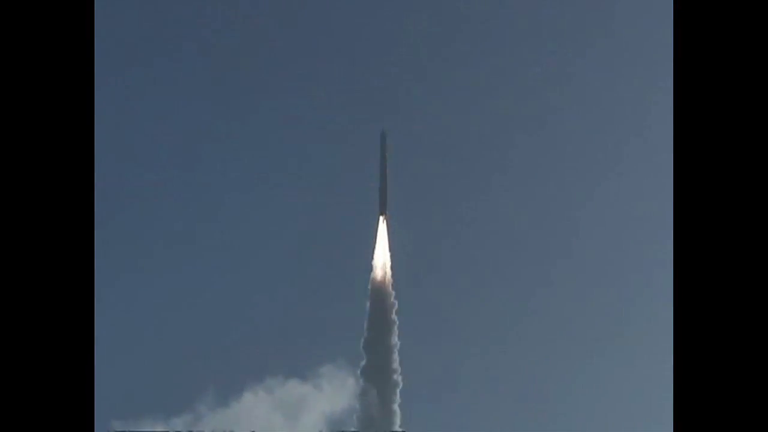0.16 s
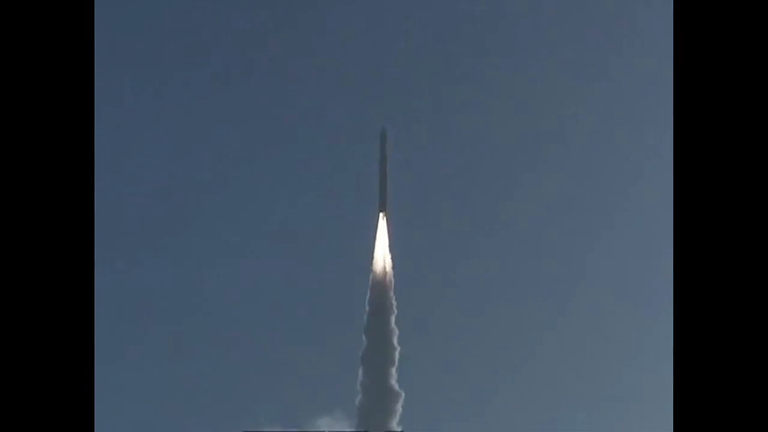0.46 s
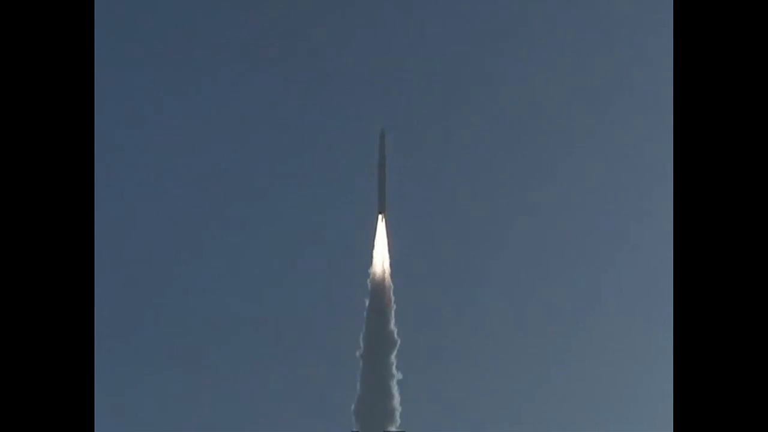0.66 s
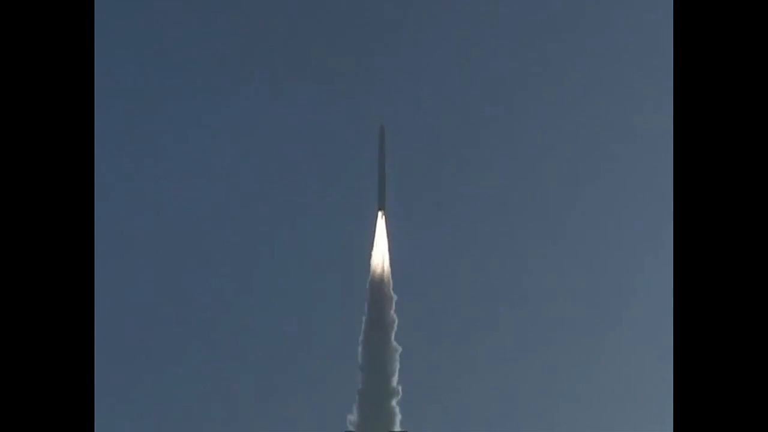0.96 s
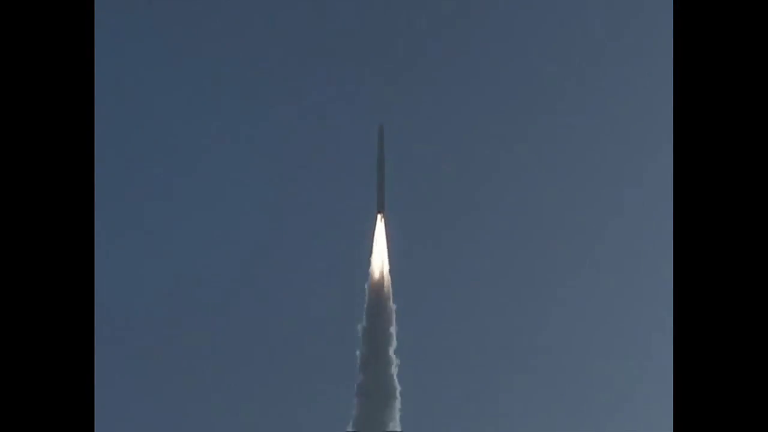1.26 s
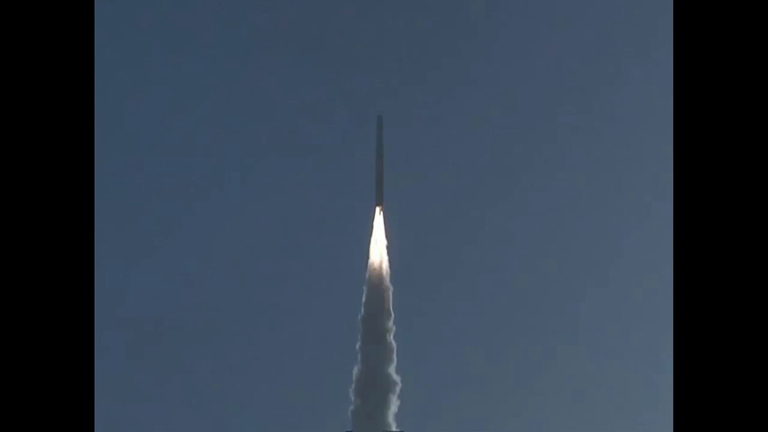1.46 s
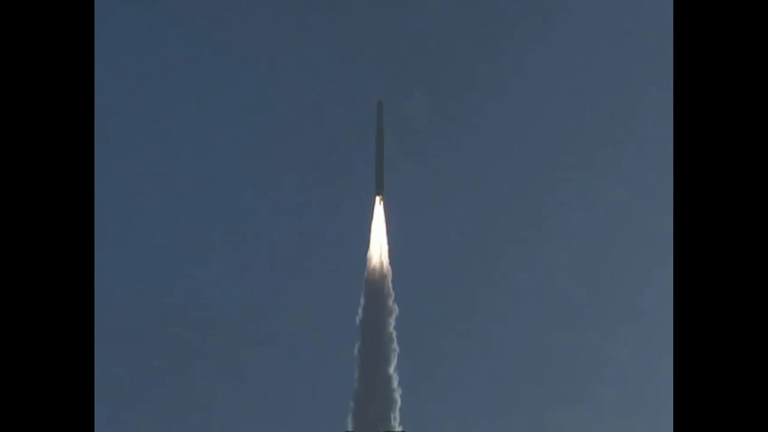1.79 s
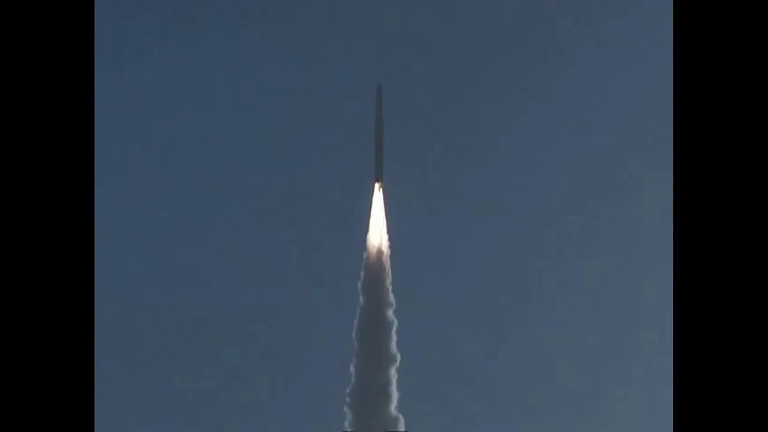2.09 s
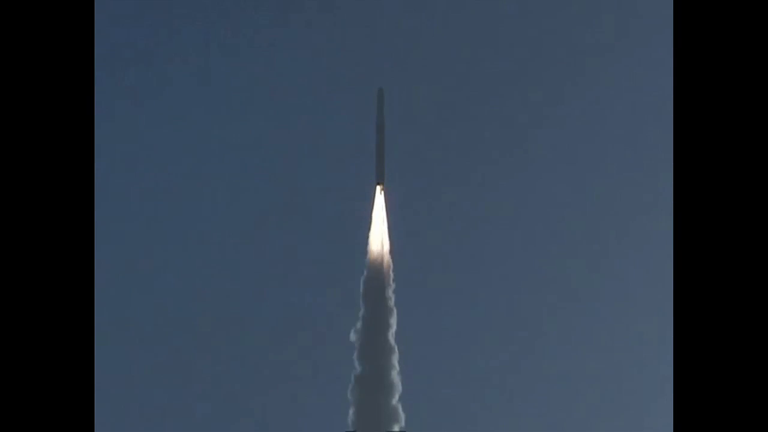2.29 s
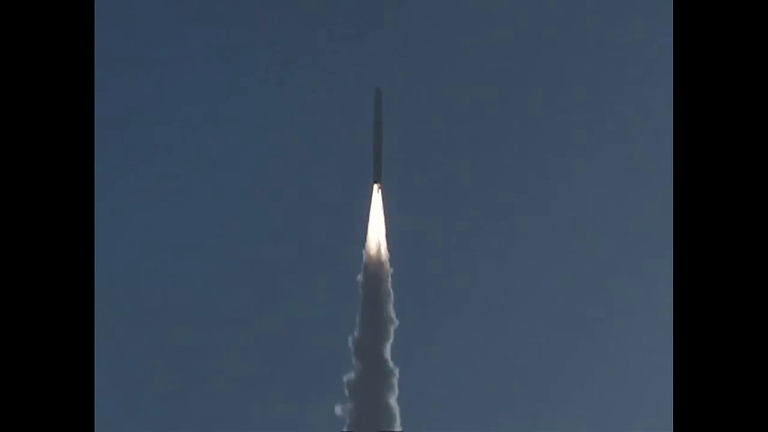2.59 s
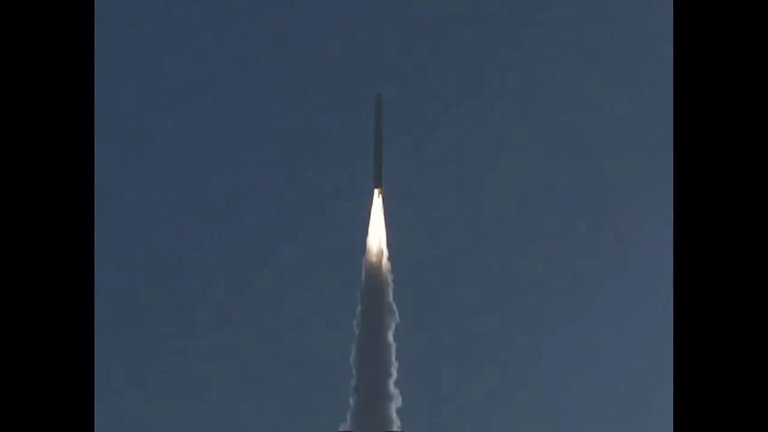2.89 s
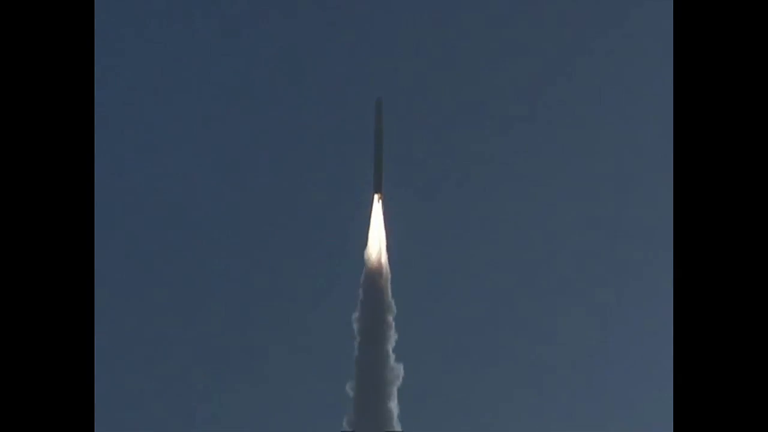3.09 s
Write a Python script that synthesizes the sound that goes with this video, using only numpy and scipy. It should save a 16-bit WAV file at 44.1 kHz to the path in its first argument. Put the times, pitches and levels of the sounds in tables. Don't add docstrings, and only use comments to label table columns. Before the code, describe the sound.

A large rocket climbing far away, heard in an open field. From 0 to 0.9 s, low wind gusts buffet the microphone while dry grass and gear rustle nearby. Around 1.2 s the deep roar rushes in, peaking near 1.5-1.65 s with crackling shocks, then drops by 1.8 s to a steady dull rumble, until about 3.25 s. From 3.0 s small parts click, scrape and faintly squeak close by; faint hiss underneath.

```python
import sys
import numpy as np
from scipy import signal
from scipy.io import wavfile
from scipy.ndimage import uniform_filter1d

SR = 44100
rng = np.random.default_rng(int(sys.argv[2]) if len(sys.argv) > 2 else 0)


def makeup_ratio(level_db):
    decades = np.asarray(level_db, float) / 20
    return 10 ** decades


def bounce(signal):
    frames = np.transpose(np.atleast_2d(signal))
    limited = np.clip(frames, -1, 1)
    pcm = np.round(limited * 32767).astype(np.int16)
    wavfile.write(sys.argv[1], SR, pcm)


N = 143325
T = np.arange(N) / SR


def evened(x):
    return x / np.sqrt(np.mean(x ** 2) + 1e-20)


def read_spectrum(points, hz):
    f, level = np.transpose(points)
    return np.interp(np.log(hz + 1), np.log(f + 1), level)


def colour(x, points):
    hz = abs(np.fft.fftfreq(16384, 1 / SR))
    log_gain = np.log(makeup_ratio(np.maximum(read_spectrum(points, hz), -100)))
    response = np.exp(np.conj(signal.hilbert(log_gain)))
    taps = np.fft.ifft(response).real[:8192]
    return signal.oaconvolve(x, taps)[:N]


def slow_drift(seconds):
    size = max(int(seconds * SR), 2)
    return evened(uniform_filter1d(uniform_filter1d(rng.standard_normal(N), size), size))


def resonate(x, hz, width):
    turn = np.exp(2j * np.pi * np.cumsum(hz * np.ones(len(x))) / SR)
    r = np.exp(-np.pi * width / SR)
    return 2 * (turn * signal.lfilter([1 - r], [1, -r], x / turn + 1e-18)).real


# (frequency [Hz], density [dB per Hz])
ROAR_SPECTRUM = [(8, -30), (20, -4), (60, -0.5), (190, -2), (330, -10), (630, -18.5), (900, -28),
                 (1500, -33.5), (3200, -50), (7000, -75.5), (12000, -72)]
# (time [s], size over the noise [dB])
JET_BANGS = [(1.408, 22), (1.542, 25), (1.589, 24), (1.71, 23), (1.76, 26), (1.838, 23), (1.869, 23),
             (1.992, 23), (2.03, 26), (2.073, 22), (2.13, 23), (2.184, 24), (2.295, 23), (2.379, 24),
             (2.415, 21), (2.512, 26), (2.957, 27), (3.099, 23), (3.154, 22)]
SHOCKS_PER_S, SHOCK_SPREAD_DB, SHOCK_SHARE = 700, 2.6, .28
BANG_S, BANG_DB, LUMP_DB = .0007, -2, .6
STEEP_S = 0.0001


def jet_noise():
    sizes = makeup_ratio(SHOCK_SPREAD_DB * np.minimum(rng.exponential(1, N), 5))
    shocks = sizes * (rng.random(N) < SHOCKS_PER_S / SR)
    turbulence = rng.standard_normal(N)
    drive = (1 - SHOCK_SHARE) * turbulence + SHOCK_SHARE * evened(shocks - shocks.mean())
    drive = drive * makeup_ratio(LUMP_DB * slow_drift(0.0064) + 1.5 * slow_drift(0.0015))
    blunt = np.hanning(round(BANG_S * SR))
    for s, db in JET_BANGS:
        drive[round(s * SR):][:len(blunt)] += makeup_ratio(db + BANG_DB) * blunt / blunt.sum()
    jet = evened(colour(drive, ROAR_SPECTRUM))
    return np.interp(T + STEEP_S * jet, T, jet)


GROUND_S, GROUND, GROUND_TOP_HZ = .00223, .68, 1100
SECOND_S, SECOND, SECOND_LOW_HZ = 0.00334, 0.15, 170


def ground_echoes(jet):
    echo = np.interp(T - GROUND_S * (1 + .012 * slow_drift(.2)), T, jet)
    late = np.interp(T - SECOND_S * (1 + .01 * slow_drift(.15)), T, jet)
    echo = signal.filtfilt(*signal.butter(1, GROUND_TOP_HZ, fs=SR), echo)
    late = signal.filtfilt(*signal.butter(1, SECOND_LOW_HZ, "high", fs=SR), late)
    return GROUND * echo + SECOND * late


# (time [s], level [dB], brightness [dB per octave])
THRUST_CURVE = [(1.05, -83, 2), (1.17, -68.5, 3.5), (1.28, -44.5, 0), (1.33, -32.5, 1), (1.39, -29.5, 1),
                (1.47, -20.5, 1), (1.54, -19.5, 2), (1.59, -19, 1.5), (1.629, -17.5, 1), (1.691, -23.5, 1),
                (1.79, -30, 2), (1.93, -28.5, 0.4), (2.2, -28, -0.5), (2.6, -29.5, -1.5), (2.8, -28.5, 0),
                (2.97, -27.5, -1), (3.1, -28.5, -0.1), (3.25, -28.5, 1)]
BRIGHT_TOP_HZ = 2520


def surge(jet):
    s, db, tilt = np.transpose(THRUST_CURVE)
    hz, t, z = signal.stft(jet, SR, nperseg=1024, noverlap=768)
    octaves = np.log2(np.clip(hz, 350., BRIGHT_TOP_HZ) / 290.0)
    z = z * makeup_ratio(octaves[:, None] * np.interp(t, s, tilt))
    jet = signal.istft(z, SR, nperseg=1024, noverlap=768)[1][:N]
    return jet * makeup_ratio(np.interp(T, s, db, left=-120))


# (time [s], peak level [dB])
SHOCK_FRONTS = [(1.4237, -49), (1.4556, -42), (1.48, -44), (1.501, -45), (1.5324, -41), (1.5384, -41),
                (1.5983, -42), (1.6277, -35), (1.634, -41), (1.6851, -45), (1.7145, -49), (1.726, -48),
                (1.8282, -50), (2.0038, -45), (2.0288, -50), (2.0682, -51), (2.381, -54), (2.7472, -54),
                (2.7746, -52), (3.017, -48)]
FRONT_HZ, FRONT_DB = 5000, 16


def crackle():
    fronts = np.zeros(N)
    for s, db in SHOCK_FRONTS:
        fronts[round(s * SR)] += makeup_ratio(db + FRONT_DB)
    u = np.arange(400) * FRONT_HZ / SR
    pulse = (1 - u) * np.exp(-u) * (1 - np.exp(-u * u * 6))
    return signal.oaconvolve(fronts, pulse)[:N]


def rocket():
    jet = jet_noise()
    jet = evened(jet + ground_echoes(jet))
    return surge(jet) + crackle()


# (time [s], level [dB])
GUST_CURVE = [(0, -78), (.02, -73), (.07, -66), (.11, -67.5), (.14, -55.5), (.19, -60), (.215, -51.5),
              (.3, -50.5), (.4, -52.5), (.49, -57.5), (.6, -56), (.7, -56), (.8, -52.5), (.895, -53),
              (.92, -72), (1.1, -65.5), (1.3, -64)]
# (frequency [Hz], density [dB per Hz])
WIND_SPECTRUM = [(8.8, -42), (15, -3), (39, -2.5), (152, -14.5), (280, -25.5), (396, -38), (600, -41.5),
                 (780, -43), (1320, -120)]


def wind():
    s, db = np.transpose(GUST_CURVE)
    eddies = rng.standard_normal(N) * makeup_ratio(1.8 * slow_drift(0.011))
    return evened(colour(eddies, WIND_SPECTRUM)) * makeup_ratio(np.interp(T, s, db, right=-70))


# (frequency [Hz], density [dB per Hz])
GRASS_SPECTRUM = [(410, -22), (700, -17.5), (1970, -9), (3390, -3), (4410, -3.5), (5390, -7.5), (6070, -8),
                  (10600, -11.5), (12000, -15), (15500, -39), (22000, -120)]
# (start [s], hold [s], level [dB], centre [Hz], fall by 60 dB [s])
GRASS_STROKES = [(0.0, .07, -57.5, 7500, .05), (.068, .016, -63, 9000, .02),
                 (.2635, .028, -56.5, 6500, .15), (.3255, .03, -54, 8500, .2), (.36, .04, -67, 4300, .35),
                 (.4645, .01, -61, 4000, .12), (.455, .1, -68.5, 6500, .7), (.53, .05, -76, 3500, .2),
                 (.574, .005, -62.5, 2400, .07), (.6, .006, -71, 2600, .06), (.638, .045, -66, 7600, .3),
                 (.73, .045, -72, 5500, .1), (.867, .004, -72, 4600, .06), (3.177, .004, -59, 3800, .07),
                 (3.203, .05, -66, 1800, .2), (3.02, .03, -70, 9500, .35)]
FOCUS_DB, CRUNCH_DB, PATCH_DB = 10, 3, 1.6
SNAP, SNAP_S = .7, .003


def rustles():
    grains = rng.standard_normal(N) * makeup_ratio(CRUNCH_DB * slow_drift(0.00021) + 2.5 * slow_drift(0.063))
    z = signal.stft(colour(grains, GRASS_SPECTRUM), nperseg=256)[2]
    patches = rng.standard_normal(z.shape[::-1])
    patches = uniform_filter1d(uniform_filter1d(patches, size=5, axis=0), size=5, axis=1)
    grass = signal.istft(z * makeup_ratio(PATCH_DB * evened(patches).T), nperseg=256)[1][:N]
    out = np.zeros(N)
    for s, hold, db, hz, t60 in GRASS_STROKES:
        a = round(s * SR)
        part = grass[a:a + SR // 2]
        t = T[:len(part)]
        focus = resonate(resonate(part, hz, .8 * hz), hz, .8 * hz)
        part = evened(part + makeup_ratio(FOCUS_DB) * focus)
        onset = np.minimum(t / 0.00072, 1) * (1 + SNAP * np.exp(-t / SNAP_S))
        tail = makeup_ratio(db - 60 * np.maximum(t - hold, 0) / t60)
        out[a:a + len(part)] += part * onset * tail
    return out


# (time [s], peak level [dB], pitch [Hz], width [Hz])
GEAR_TICKS = [(.125, -63, 750, 200), (.16, -63, 600, 400), (.466, -60, 1400, 300), (.47, -63, 700, 200),
              (.943, -52.5, 750, 900), (1.0994, -61, 2930, 400), (3.0235, -46, 9500, 5000),
              (3.033, -49, 8200, 2500), (3.1245, -44, 8200, 2500), (3.1245, -48, 4000, 1200),
              (3.166, -53, 7200, 2500), (3.2065, -36, 2800, 800), (3.2065, -36, 1800, 900),
              (3.224, -37, 3300, 700), (3.224, -47, 5800, 2000), (3.224, -42, 2000, 900),
              (.265, -56, 10400, 900), (.327, -54, 10300, 900), (3.208, -60, 8500, 700)]


def ticks():
    out, t = np.zeros(N + SR), T[:2000]
    for s, db, hz, width in GEAR_TICKS:
        a, decay = round(s * SR), np.pi * width * t
        envelope = np.e * decay * np.exp(-decay)
        out[a:a + len(t)] += makeup_ratio(db) * envelope * np.sin(2 * np.pi * hz * t)
    return out[:N]


# (start [s], length [s], level [dB], pitch [Hz], width [Hz])
GEAR_SCRAPES = [(3.035, .17, -59.5, 4030, 500), (3.193, .07, -56, 4200, 650), (3.198, .075, -53, 3250, 350),
                (1.11, .08, -66, 150, 40), (.325, .14, -64, 4250, 500), (.262, .025, -62, 2300, 700),
                (.265, .035, -60, 4200, 600), (.11, .08, -73, 900, 700), (.36, .2, -78, 700, 150),
                (.324, .016, -51.5, 3300, 500), (3.08, .22, -69, 5750, 800), (3.2, .08, -54, 2000, 1200),
                (3.06, .12, -62, 2300, 400), (.76, .025, -72, 4000, 900)]


def scrapes():
    out = np.zeros(N + SR)
    for s, length, db, hz, width in GEAR_SCRAPES:
        a, count = round(s * SR), round(length * SR)
        noise = rng.standard_normal(SR // 4) * makeup_ratio(CRUNCH_DB * slow_drift(.0012)[:SR // 4])
        rub = evened(resonate(resonate(noise, hz, width), hz, width))[:count]
        out[a:a + count] += makeup_ratio(db) * rub * np.hanning(count) ** .7
    return out[:N]


SQUEAK_S, SQUEAK_LEN_S, SQUEAK_DB, SQUEAK_HZ, SQUEAK_RISE_HZ = 3.173, .038, -68, 8100, 950


def squeak():
    out = np.zeros(N + SR)
    u = np.arange(0, 1, 1 / (SQUEAK_LEN_S * SR))
    hz = SQUEAK_HZ + SQUEAK_RISE_HZ * np.sin(np.pi * u ** 1.54 * .72)
    tone = np.sin(2 * np.pi * np.cumsum(hz) / SR)
    a = round(SQUEAK_S * SR)
    out[a:a + len(u)] += makeup_ratio(SQUEAK_DB) * np.sin(np.pi * u ** 1.2) * tone
    return out[:N]


# (frequency [Hz], density [dB per Hz])
AIR_SPECTRUM = [(59, -58), (100, -2), (449, -5.5), (548, -14.5), (594, -7.5), (1350, -10.5), (1490, -7.5),
                (4390, -8), (12000, -14), (15500, -41), (22000, -120)]
# (pitch [Hz], width [Hz], level [dB])
WHINES = [
    (8600, 60, -88),
    (7300, 60, -91),
    (3400, 60, -89),
]


def air():
    hiss = rng.standard_normal(N) * makeup_ratio(1.8 * slow_drift(0.021))
    out = makeup_ratio(-69.5) * evened(colour(hiss, AIR_SPECTRUM))
    for hz, width, db in WHINES:
        out = out + makeup_ratio(db) * evened(resonate(rng.standard_normal(N), hz, width))
    return out


def scene():
    outdoors = rocket() + wind() + air()
    close_by = rustles() + (ticks() + scrapes() + squeak())
    return (outdoors + close_by)[None]


def low_pass(x):
    return signal.sosfilt(signal.butter(12, 12100, fs=SR, output="sos"), x)


LIMIT = .35
EDGE_HZ = 12050


def record(dry):
    softened = LIMIT * np.tanh(dry / LIMIT)
    lowpass = signal.firwin(1023, EDGE_HZ, window=("kaiser", 9), fs=SR)
    mix = signal.oaconvolve(softened, lowpass[None], "same")
    return low_pass(mix)


dry = scene()
out = record(dry)
bounce(out)
```